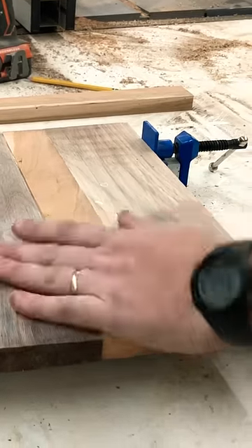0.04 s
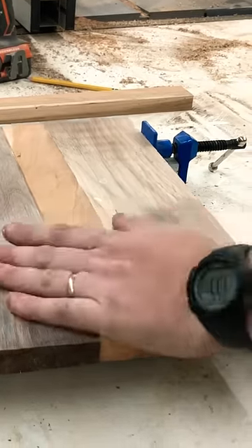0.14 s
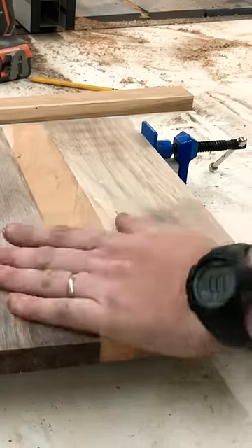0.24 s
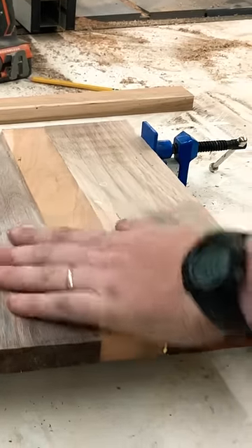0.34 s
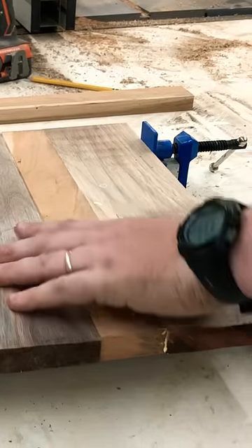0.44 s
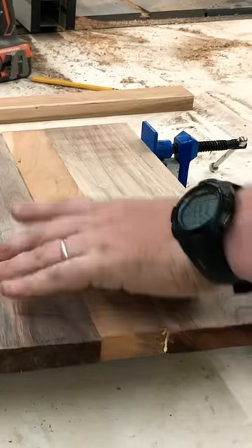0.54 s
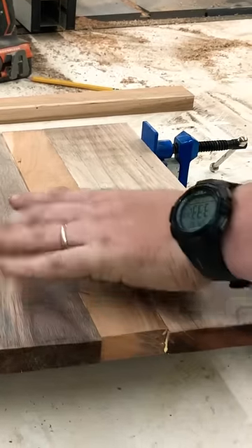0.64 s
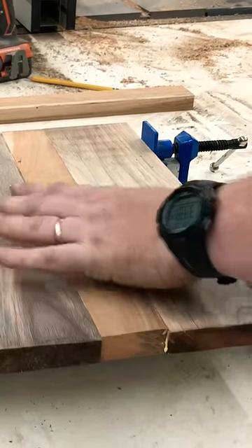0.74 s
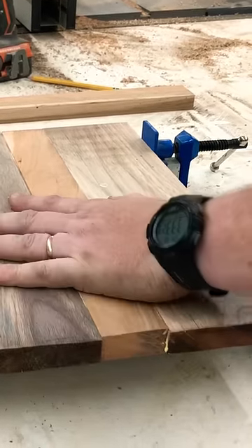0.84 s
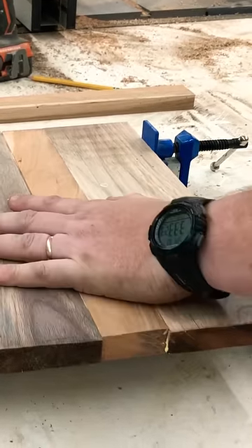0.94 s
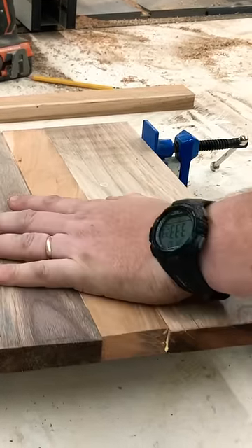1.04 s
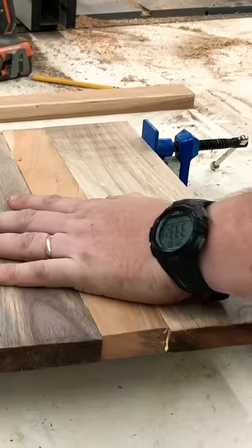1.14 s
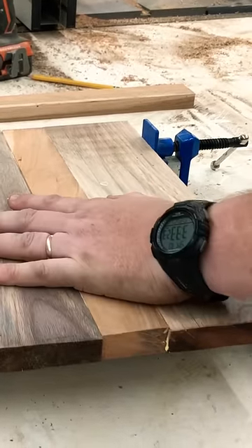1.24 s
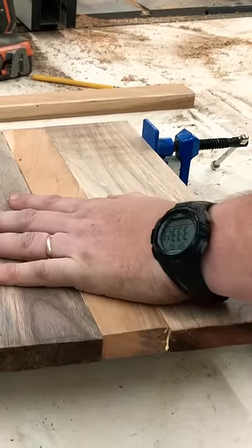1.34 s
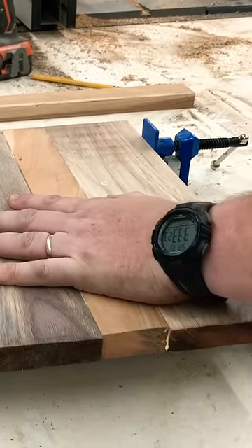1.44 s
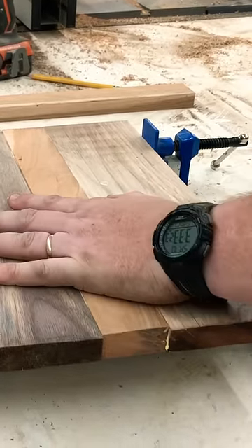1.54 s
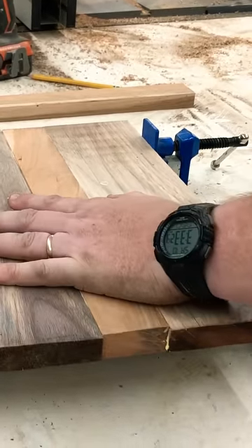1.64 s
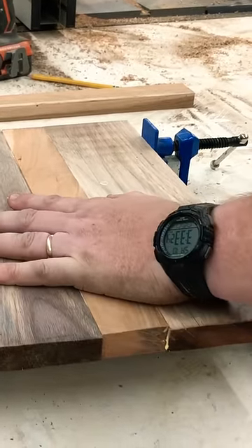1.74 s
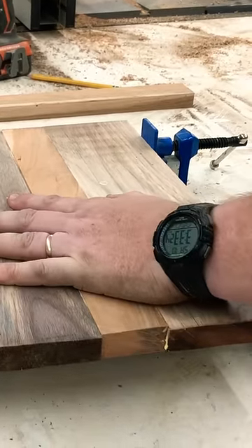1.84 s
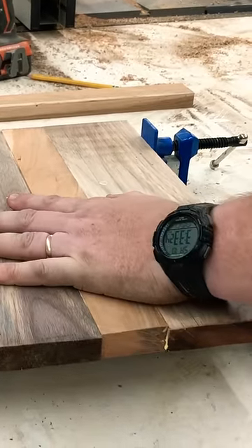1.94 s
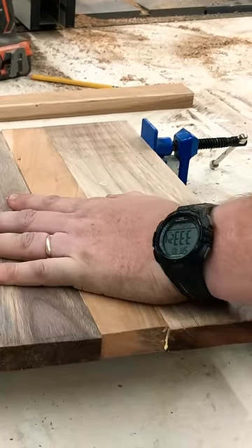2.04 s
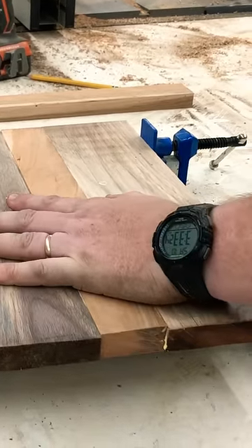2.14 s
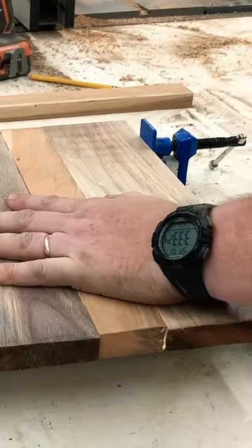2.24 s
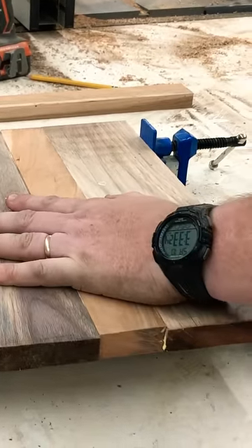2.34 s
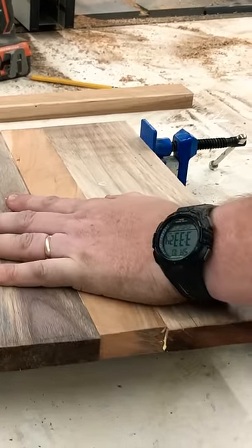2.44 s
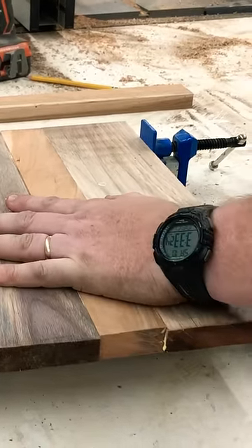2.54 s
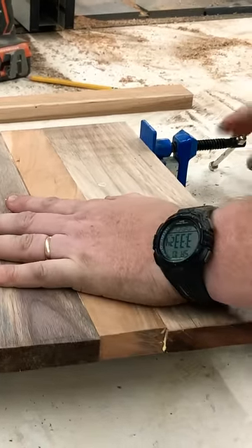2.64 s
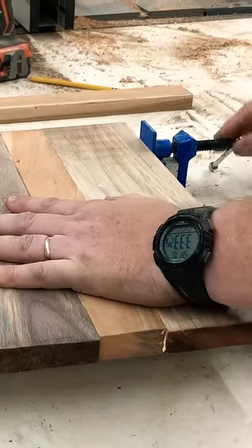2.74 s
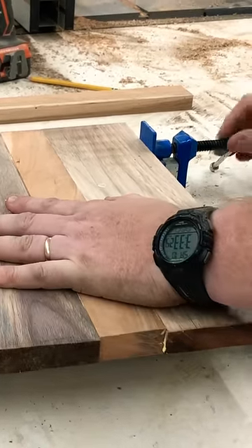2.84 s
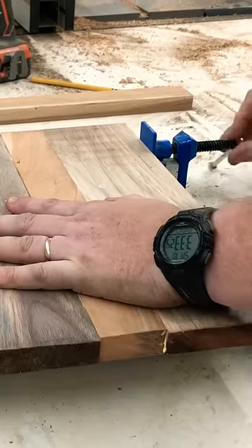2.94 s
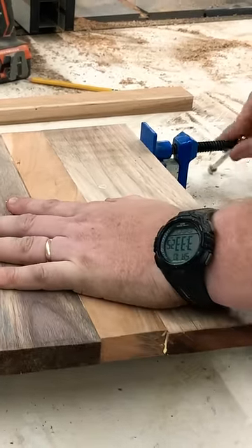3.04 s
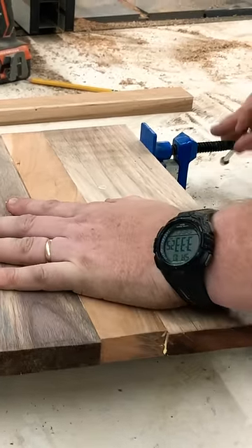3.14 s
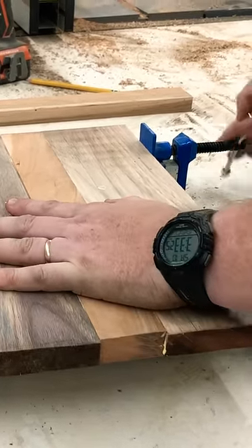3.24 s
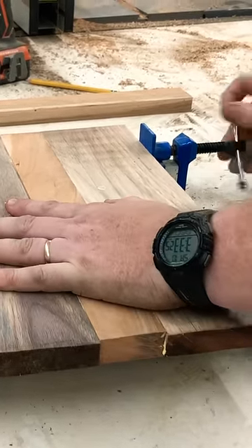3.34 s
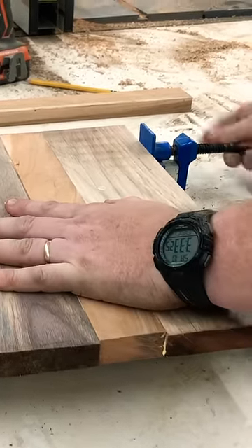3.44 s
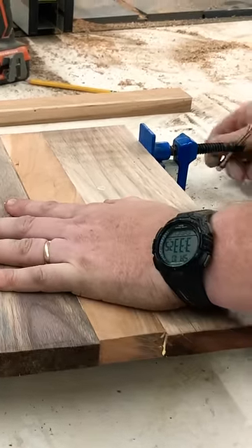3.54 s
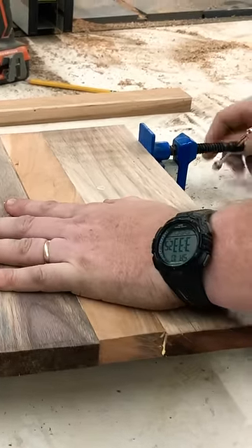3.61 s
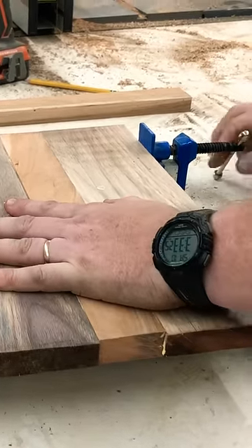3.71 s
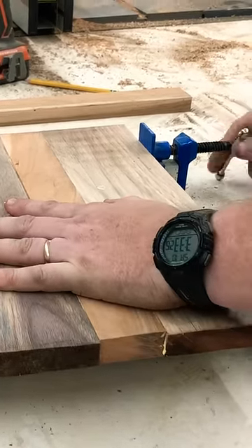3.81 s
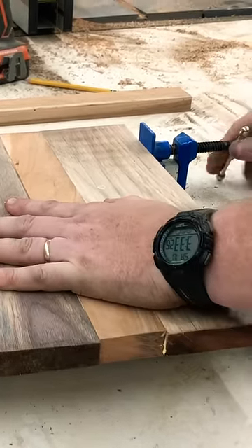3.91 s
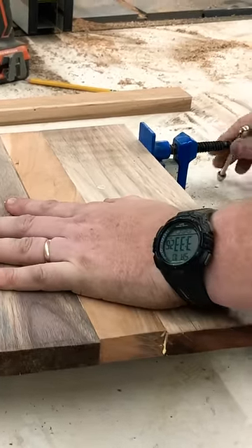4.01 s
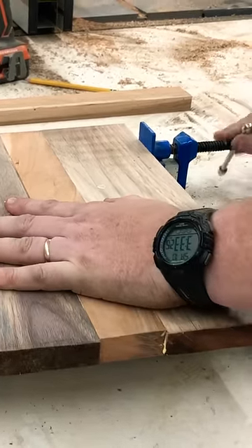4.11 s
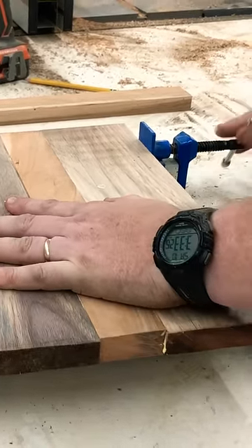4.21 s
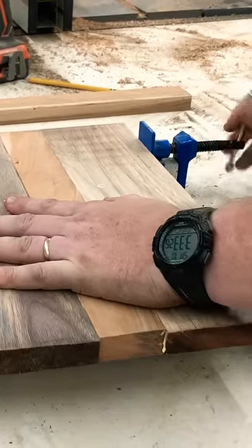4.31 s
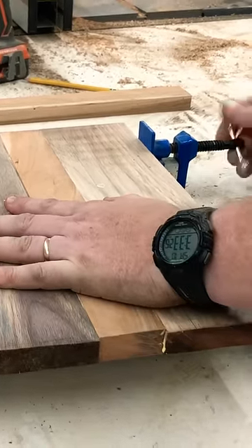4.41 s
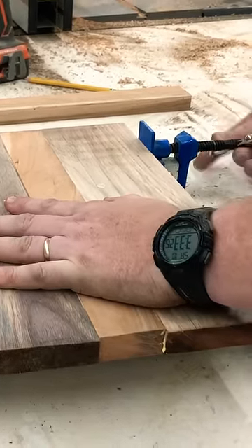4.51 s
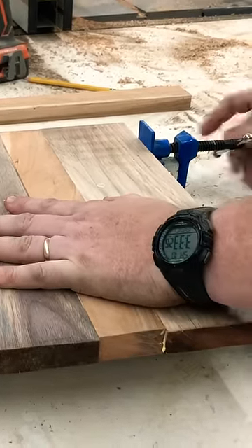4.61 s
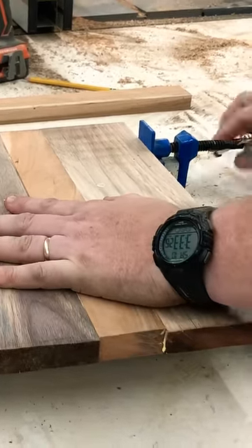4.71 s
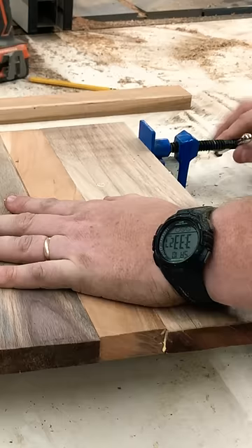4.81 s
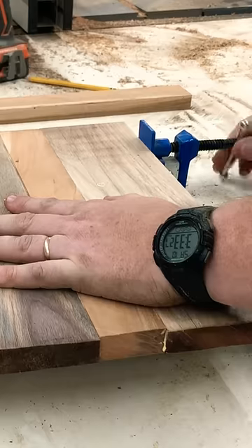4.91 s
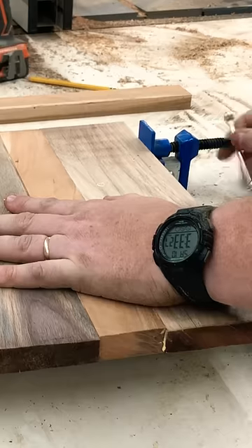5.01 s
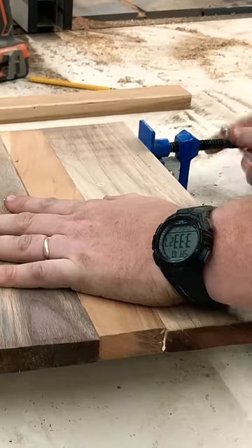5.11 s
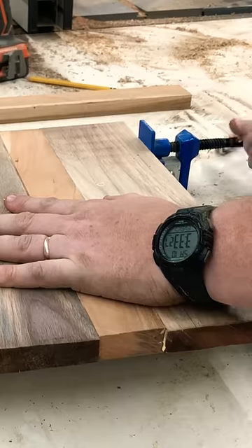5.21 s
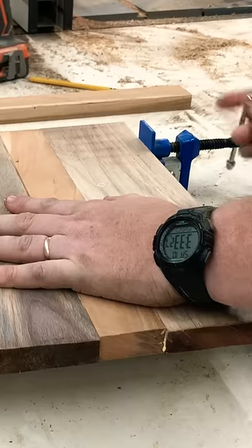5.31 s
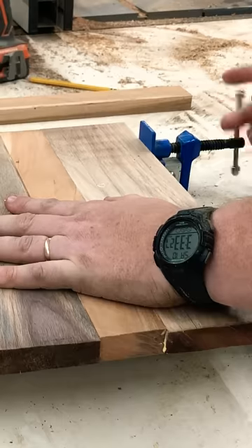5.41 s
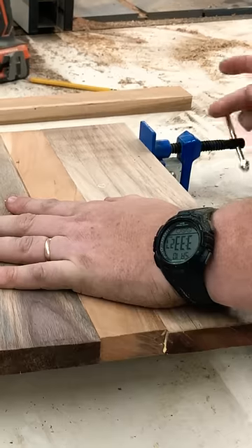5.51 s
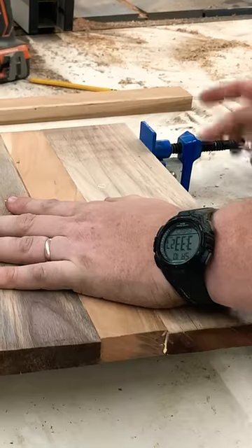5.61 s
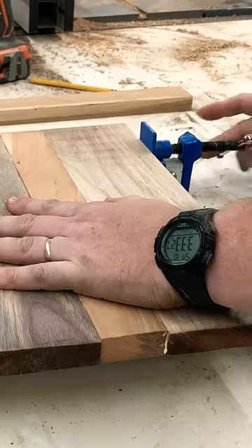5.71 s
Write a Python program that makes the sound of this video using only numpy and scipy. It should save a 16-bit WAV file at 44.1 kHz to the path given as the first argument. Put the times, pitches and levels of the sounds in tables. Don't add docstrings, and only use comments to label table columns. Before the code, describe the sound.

In a small, lightly reverberant workshop, a hand shifts over wooden boards with faint scuffs and one loud knock. A hollow clack follows after a pause, then near-silence. A clamp handle starts clattering, its screw giving soft taps and dry rubbing, and ends with a hard metallic clack and smaller knocks. Close single mono microphone, faint room hum and hiss.

```python
import sys
import numpy as np
from scipy import signal
from scipy.fft import rfft, irfft, next_fast_len
from scipy.io import wavfile
from scipy.ndimage import map_coordinates

SR = 44100
rng = np.random.default_rng(int(sys.argv[2]) if len(sys.argv) > 2 else 0)


def invert_db(x):
    u = np.asarray(x, float) / 20
    return 10 ** u


def store_wav(level_fs):
    pcm = np.round(np.clip(np.atleast_2d(level_fs), -1, 1) * 32767)
    wavfile.write(sys.argv[1], SR, pcm.T.astype(np.int16))


N = 254016

# pitch in Hz, width in Hz, level in dB.
FRAME_MODES = [(62.3, 72, -10), (96.3, 6.3, -1), (145.7, 22.3, 3.5), (220, 120, -4)]
BOARD_MODES = [(216.6, 78, -10), (360.3, 112, 0), (445, 50, 2), (532, 159, -2.5), (713, 97, -7.5)]
PIPE_MODES = [(802, 116, -5.5), (1040, 128, -4.5), (1317, 322, -0.5), (1360, 162, 2), (1706, 210, -8.5),
              (1806, 103, -2.5), (2088, 490, -7.5), (2144, 370, -11.5), (2720, 780, -22)]
STEEL_MODES = [(2415, 510, 7), (3375, 470, 7), (4100, 1200, 4.5), (5630, 530, -2.5), (6070, 197, 1.5),
               (8000, 16000, -12.5)]

# start in seconds, peak in dB, steel edge in dB, strongest pitch in Hz.
PIPE_KNOCKS = [(0.283, -48, 4, 880), (0.537, -56, -28, 1530), (2.752, -37.5, -8.5, 1250),
               (2.846, -42, -20, 860), (2.909, -36.5, -2, 1840), (2.92, -43, 0.5, 1810),
               (2.9485, -30.5, -10, 1240), (3.531, -45, -14, 1360), (3.729, -47.5, -39, 1070),
               (3.89, -53, -33, 1270), (4.059, -42, -40, 875), (4.138, -45.5, -25, 713),
               (4.193, -40, -29, 900), (4.8885, -26, -13.5, 1165), (4.95, -36, -38, 1000),
               (5.424, -35.5, -11, 1185)]
# start in seconds, peak in dB, steel edge in dB,
# strongest pitch in Hz.
BOARD_KNOCKS = [(1.842, -31.5, -5.5, 1360), (2.401, -48, -39, 600), (3.031, -44.5, -9, 875),
                (3.087, -51, -9, 810), (3.219, -50, -4, 1500), (3.625, -49.5, -22, 1380),
                (3.765, -50, -29, 790), (4.081, -51, -34, 1360), (4.4, -55, -4, 1360),
                (4.464, -51.5, -10, 1090), (4.801, -49.5, -4.5, 1710), (5.079, -33.5, -7, 1110),
                (5.16, -41.5, -13, 820)]
# start in seconds, peak in dB, steel edge in dB, strongest pitch in Hz.
PALM_THUMPS = [
    (0.236, -63, 3, 1490),
    (3.417, -60, -26, 768),
]
# start in seconds, peak in dB, strongest pitch in Hz, contact in ms.
PIPE_DRAGS = [(0.2685, -30, 1050, 5.4), (1.732, -46.5, 1590, 11), (1.793, -47, 1460, 62),
              (1.815, -45, 1670, 24), (2.833, -40.5, 1080, 12.6), (3.82, -54.5, 1050, 24),
              (4.14, -44, 725, 18), (4.288, -55, 1020, 8), (4.906, -42, 774, 16), (4.923, -28.5, 1040, 23),
              (4.959, -36, 885, 18), (5.093, -44, 1390, 20)]
# start in seconds, peak in dB, strongest pitch in Hz,
# contact in ms.
BOARD_DRAGS = [(0.259, -40, 1610, 11.5), (1.743, -56, 1590, 38), (2.371, -57.5, 700, 21),
               (2.962, -52, 860, 9.1), (3.129, -52.5, 1150, 7.8), (3.334, -52.5, 800, 51),
               (3.53, -44, 1270, 16), (3.542, -52, 1380, 10), (3.602, -47, 1190, 28),
               (3.664, -57, 1040, 19), (4.065, -47.5, 1300, 21), (4.164, -46, 1200, 17),
               (4.205, -44, 735, 9.3), (4.355, -61.5, 1730, 13), (4.543, -49, 865, 10.6)]
# start in seconds, peak in dB, strongest pitch in Hz, contact in ms.
SCUFFS = [
    (0.011, -60.5, 1710, 47),
    (2.965, -46.5, 2100, 25),
    (4.184, -50.5, 900, 12),
    (4.971, -59, 2600, 17),
]
# start in seconds, peak in dB, push in ms.
FRAME_THUDS = [(0.014, -55, 7.3), (0.267, -41, 4.4), (0.297, -62, 10), (0.342, -49.5, 8.7),
               (0.423, -46.5, 5.2), (0.539, -79, 6.1), (0.8, -49, 23), (1.741, -47.5, 16),
               (1.841, -46, 5.8), (2.763, -51.5, 8.9), (2.946, -62, 7.7), (3.248, -49, 9.2),
               (3.269, -49.5, 16), (3.341, -53, 10), (3.415, -41, 2.9), (3.539, -49, 11.5),
               (3.624, -43.5, 27), (4.065, -49.5, 4.5), (4.19, -48, 7.8), (4.323, -48, 14),
               (4.464, -44.5, 5.5), (4.798, -46.5, 47), (4.884, -40, 12), (5.078, -41.5, 17),
               (5.158, -43, 5.3)]

# start in seconds, peak in dB,
# pitch in Hz, ring in ms.
BUMPS = [(.238, -46, 350, 8.7), (0.2697, -27.5, 1096, 3.8), (0.2694, -31.5, 1515, 5), (.270, -31, 596, 5.6),
         (.270, -44.5, 2600, 4.4), (0.2706, -27, 220, 9), (.295, -42, 198, 13), (.35, -43, 248, 14),
         (.425, -46, 203, 25), (.536, -54, 1505, 7.2), (1.819, -50, 1730, 6), (2.753, -42, 1490, 3.6),
         (2.755, -49.5, 685, 8.8), (2.862, -47, 450, 6.7), (2.919, -45, 5540, 4), (2.96, -35, 1086, 5.5),
         (3.087, -47, 458, 5.4), (3.512, -54, 905, 8.3), (3.531, -42.5, 990, 4), (3.546, -46, 400, 5.4),
         (3.612, -46, 1210, 4), (3.627, -48, 347, 8), (3.69, -50, 550, 7.1), (3.768, -58, 353, 9.9),
         (4.038, -60.5, 684, 11), (4.061, -45, 900, 6.4), (4.078, -44, 417, 7.8), (4.14, -51, 1790, 6),
         (4.14, -45, 696, 4.7), (4.171, -42, 1140, 5), (4.189, -45, 931, 4.5), (4.203, -41.5, 1320, 4.2),
         (4.228, -51, 690, 6.3), (4.302, -49.5, 448, 7), (4.354, -58, 1610, 5.1), (4.385, -55.5, 1650, 6),
         (4.548, -53, 856, 7), (4.889, -29, 1095, 6), (4.889, -30.5, 1765, 4.6), (4.89, -34, 570, 7.3),
         (4.905, -38, 600, 7), (4.946, -35, 995, 6), (4.965, -40, 500, 6), (5.081, -36, 1070, 5),
         (5.081, -34, 1680, 5.9), (5.083, -38, 520, 7), (5.159, -35, 547, 6.6), (5.424, -42, 594, 7),
         (5.425, -46, 955, 5.4),
         (1.79, -67, 7640, 18), (1.81, -71, 6700, 30), (1.842, -48, 3000, 2.8), (2.752, -51, 2600, 3.6),
          (2.846, -54, 2300, 4), (2.908, -42, 1950, 4.5), (2.908, -44, 1100, 4), (2.908, -47, 2680, 4.4),
          (2.948, -35, 1400, 4.4), (2.948, -38, 2100, 4.8), (2.948, -46, 2740, 4.8),
          (5.422, -43.5, 2310, 5), (5.424, -51, 4470, 4), (5.44, -62, 2400, 20), (4.8, -52, 1000, 6)]
# start in seconds, peak in dB, contact in ms.
CRACKS = [(2.751, -46, 2.7), (2.847, -55, 4), (2.948, -40, 2), (3.219, -52, 2.5), (4.14, -60, 3),
          (4.199, -51, 3), (4.888, -37, 2.5), (5.079, -44, 3), (5.084, -46, 3), (5.159, -52, 3),
          (5.423, -41.5, 2.5)]
# pitch in Hz, width in Hz, level in dB.
CRACK_MODES = [(2600, 1900, -2.5), (5260, 1700, 3)]

# start in seconds, pitch in Hz, level in dB,
# time to fade by 60 dB in seconds.
RINGS = [(.02, 6600, -70, .25), (.03, 6100, -73, .3), (2.755, 1400, -53, .25), (3.63, 3250, -62, .06),
         (.285, 6600, -70, .12), (.595, 4680, -73, .25), (1.736, 1770, -50, .14), (1.79, 5650, -76, .3),
         (1.843, 1370, -39, .24), (1.86, 620, -50, .25), (2.19, 1360, -67, .6), (2.915, 9780, -66, .12),
         (2.92, 1830, -52, .12), (2.95, 9780, -66, .22), (2.95, 1830, -52, .6), (3.0, 3300, -68, .5),
         (.27, 245, -36, .14), (3.02, 6330, -71, .15), (3.818, 1080, -57, .2), (4.06, 1360, -50, .35),
         (4.065, 3200, -64, .08), (4.215, 705, -52, .25), (4.35, 1620, -63, .1), (4.4, 1400, -60, .3),
         (4.925, 1040, -40, .2), (5.082, 5350, -63, .25), (5.425, 1830, -49, .1)]
# start in seconds, level in dB.
FREE_PIPE_TAP = (.541, -48)
# pitch in Hz, level in dB, time to fade by 60 dB in seconds.
FREE_PIPE_PARTIALS = [(704, -1, .42), (937, -2, .2), (1085, -20, .3), (1385, -14, .2), (1760, -14, .25),
                      (2060, -16, .25), (2430, -23, .2), (2540, -25, 1.6), (2800, -15, .22),
                      (3190, -27, .2)]

# time of full effort in seconds, length in seconds,
# grind in dB, weight on the bench in dB.
STROKES = [(0.031, 0.092, -57, 4), (0.31, 0.085, -54.5, 10.5), (0.432, 0.092, -72.5, 19),
           (0.579, 0.081, -63, -2), (0.858, 0.98, -84.5, 12), (1.798, 0.07, -61, 1),
           (1.93, 0.088, -64, 9.5), (2.163, 0.18, -74.5, -13), (2.45, 0.063, -92, 22), (3, 0.19, -54, -1.5),
           (3.36, 0.32, -70.5, 13), (3.614, 0.056, -57.5, 1), (3.854, 0.2, -83, -7), (4.188, 0.12, -59, 0),
           (4.44, 0.11, -74.5, 19.5), (4.632, 0.069, -97, 34), (4.834, 0.02, -90, 21),
           (4.992, 0.13, -53.5, 0.5), (5.152, 0.097, -61, 2), (5.47, 0.14, -66.5, 5)]
# time of top speed in seconds, length in seconds, hiss in dB, brightest pitch in Hz.
SKIN_SLIDES = [(0.056, 0.12, -63, 5430), (0.105, 0.019, -64.5, 10400), (0.41, 0.2, -69, 7940),
               (0.527, 0.064, -78, 14500), (0.634, 0.036, -69, 10030), (0.956, .05, -75, 12000),
               (2.18, 0.037, -76, 12000), (3.59, 0.043, -67, 11900), (3.673, 0.033, -86, 10000),
               (4.5, .025, -74, 11800), (4.582, 0.031, -69.5, 12000), (4.945, 0.041, -71, 11000),
               (5.227, 0.04, -74, 10000)]
# start in seconds, peak in dB, pitch in Hz, length in cycles.
TICKS = [(0.02, -55, 8700, 9.5), (.019, -58, 6070, 2.7), (0.181, -47, 7600, 3.3), (.182, -67, 13000, 2.4),
         (0.234, -59, 13500, 3), (0.2877, -49.5, 8950, 10), (1.794, -66, 7700, 5.8),
         (1.8407, -54, 12300, 1.3), (1.8443, -41, 3600, 0.97), (1.848, -49, 13000, 2.2),
         (1.987, -53, 13500, 2.9), (1.9862, -60, 8000, 1.8), (2.127, -56, 14000, 4.6),
         (2.127, -59, 8450, 3.7), (2.1795, -64, 13500, 1.9), (2.530, -53, 6600, 3.4),
         (2.908, -38, 6940, 2.3), (2.95, -48, 9000, 2.9), (2.915, -54, 13500, 2.5), (3.193, -60, 6000, 2.5),
         (3.664, -55, 8900, 1.5), (3.628, -52, 3200, 3), (3.604, -60, 2500, 1.2), (.02, -56, 2400, 1),
         (4.197, -50, 5400, 6), (4.889, -54, 11000, 1.3)]

# pitch in Hz, level in dB per Hz.
AIR_COLOUR = [(15, -51), (25, -29), (42, 3), (80, 0.5), (120, -3.5), (373, -7.5), (439, -11), (734, -21.5),
              (1040, -18), (1480, -27.5), (4870, -26.5), (14800, -32.5), (16000, -28)]
# pitch in Hz, time to fade by 60 dB in seconds.
SHOP_FADE = [(100, 0.5), (400, 0.59), (1500, 0.24), (5000, 0.3), (12000, 0.33)]


def knocks():
    pipe_wood_db, board_wood_db, palm_wood_db, scuff_wood_db = -10, 3, 18.5, -11
    knock_ms, drag_edge_db, scuff_edge_db = 8.8, -22, -5

    sharp = []
    for rows, wood_db in ((PIPE_KNOCKS, pipe_wood_db), (BOARD_KNOCKS, board_wood_db), (PALM_THUMPS, palm_wood_db)):
        sharp += [(s, db, wood_db, edge_db, hz, knock_ms) for s, db, edge_db, hz in rows]

    dragged = []
    for rows, wood_db, edge_db in ((PIPE_DRAGS, pipe_wood_db, drag_edge_db),
                                   (BOARD_DRAGS, board_wood_db, drag_edge_db),
                                   (SCUFFS, scuff_wood_db, scuff_edge_db)):
        dragged += [(s, db, wood_db, edge_db, hz, ms) for s, db, hz, ms in rows]

    out = contacts(sharp, rise=0.4, wet_db=-3.0)
    out += contacts(dragged, rise=1.35, wet_db=-3.5)
    for s, db, ms in FRAME_THUDS:
        boom = struck(blow(ms, rise=0.75), FRAME_MODES, top_hz=243, wet_db=-4.0)
        add(out, s, invert_db(db) * boom)
    return out


def contacts(rows, rise, wet_db):
    out = np.zeros(N)
    for s, db, wood_db, edge_db, hz, ms in rows:
        force = blow(ms, rise)
        pipe = struck(force, PIPE_MODES + [(hz, 240, 1.5)], top_hz=2100, wet_db=wet_db)
        wood = struck(force, BOARD_MODES, top_hz=780, wet_db=wet_db + 2.0)
        steel = struck(force, STEEL_MODES, top_hz=9750, wet_db=wet_db - 3.5)
        sound = pipe + invert_db(wood_db) * wood + invert_db(edge_db) * steel
        add(out, s - .001, invert_db(db + 1.0) * sound)
    return out


def blow(ms, rise):
    u = np.arange(2 ** 14) / (max(ms, .3) * SR / 1000)
    force = rng.standard_normal(len(u)) * u ** rise * np.exp(-2.5 * u)
    return np.array([force, walls(len(u), delay=0.00033 + ms / 1500)])


def struck(force, modes, top_hz, wet_db):
    ring = body(modes, rng.normal(0, 1.6, len(modes)))
    direct, echo = filtered(force, lambda f: ring(f) * dulled(f, top_hz))
    echo *= invert_db(wet_db) * np.linalg.norm(direct) / np.linalg.norm(echo)
    return (direct + echo) / np.abs(direct).max()


def bumps():
    notes, cracks = np.zeros(N), np.zeros(N)
    t = np.arange(SR // 10) / SR
    for s, db, hz, ms in BUMPS:
        u = t * 3000 / max(ms, 1)
        envelope = np.e * u * np.exp(-u)
        tone = np.sin(2 * np.pi * (hz * t + rng.random()))
        add(notes, s, invert_db(db) * envelope * tone)
    for s, db, ms in CRACKS:
        decay = np.exp(-t * 1000 / max(ms, .5))
        add(cracks, s, invert_db(db) * rng.standard_normal(len(t)) * decay)
    crack_ring = body(CRACK_MODES)
    cracks = filtered(cracks, lambda f: crack_ring(f) * dulled(f, 6500))
    return shop(notes + cracks, wet_db=-11, delay=.004)


def rings():
    attack_s, tap_swell_s = .003, .012
    tap_s, tap_db = FREE_PIPE_TAP
    rows = [(s, hz, db, t60, attack_s) for s, hz, db, t60 in RINGS]
    rows += [(tap_s, hz, tap_db + db, t60, tap_swell_s) for hz, db, t60 in FREE_PIPE_PARTIALS]

    out, t = np.zeros(N), np.arange(SR // 2) / SR
    for s, hz, db, t60, attack in rows:
        tone = np.sin(2 * np.pi * (hz * t + rng.random()))
        fade = invert_db(db - 60 * t / t60) * (1 - t / t[-1])
        add(out, s, fade * (1 - np.exp(-t / attack)) * tone)
    return out * invert_db(.6 * wobble(40))


def rubbing():
    rest_db = -78.5
    s, length, grind_db, weight_db = np.transpose(STROKES)
    effort = swell(s, length, rise_db=20.5, fall_db=15.5)
    boom_db = grind_db + weight_db
    scrape_db = grind_db + 0.5 * weight_db - 2
    rasp_db = -81.5 + 0.59 * (grind_db - rest_db)
    # stroke levels in dB, extra level at rest in dB, body, softness limit in Hz.
    layers = [(boom_db, -5.5, FRAME_MODES, 250), (scrape_db, -1.0, BOARD_MODES, 800),
              (grind_db, -2.0, PIPE_MODES, 2100), (rasp_db, -8.5, STEEL_MODES, 8000)]

    slips = 1.6 * wobble(35) + 1.6 * wobble(120)
    out = np.zeros(N)
    for db, extra_rest_db, modes, top_hz in layers:
        rough = rng.standard_normal(N) * invert_db(slips + 1.6 * wobble(60))
        ring = body(modes)
        gain = invert_db(db) @ effort + invert_db(rest_db + extra_rest_db)
        out += gain * unit(filtered(rough, lambda f: ring(f) * dulled(f, top_hz)))
    return shop(out, wet_db=-13.5, delay=0.0079) * invert_db(0.5)


def swell(s, length, rise_db, fall_db):
    u = (np.arange(N) / SR - np.reshape(s, (-1, 1))) / np.reshape(length, (-1, 1))
    slope_db = np.where(u < 0, rise_db, -fall_db)
    return invert_db(np.maximum(slope_db * u, -200))


def skin():
    s, length, db, bright_hz = np.transpose(SKIN_SLIDES)
    gains = swell(s, length, rise_db=11.5, fall_db=10)
    hiss = []
    for hz in bright_hz:
        colour = body([(hz, .3 * hz, 0), (15600, 1500, -5)])
        half_second = unit(filtered(rng.standard_normal(SR // 2), colour))
        hiss.append(np.resize(half_second, N))
    return invert_db(db) @ (gains * hiss) * invert_db(2.9 * wobble(50) - 3.0)


def ticks():
    out, t = np.zeros(N), np.arange(SR // 8) / SR
    for s, db, hz, cycles in TICKS:
        snap = rng.standard_normal(len(t)) * np.exp(-t / .0005)
        band = body([(hz, hz / max(cycles, .5), 0)])
        dry_snap = peak_one(filtered(snap, lambda f: band(f) ** 2))
        add(out, s, invert_db(db) * shop(dry_snap, wet_db=-15, delay=.004))
    return out


def air():
    hiss = filtered(rng.standard_normal(N), lambda hz: invert_db(along(AIR_COLOUR, hz)))
    return invert_db(-67.5 + 0.36 * wobble(2.0)) * unit(hiss)


def shop(x, wet_db, delay):
    return x + invert_db(wet_db) * signal.fftconvolve(x, walls(SR // 2, delay))[:len(x)]


def walls(length, delay):
    hz, t, z = signal.stft(rng.standard_normal(length), SR, nperseg=256)
    fade = invert_db(-60 * t / along(SHOP_FADE, hz)[:, None])
    tail = signal.istft(z * fade, SR, nperseg=256)[1]
    tail *= 1 - np.exp(-np.arange(len(tail)) / (delay * SR))
    return tail[:length] / np.linalg.norm(tail)


def body(modes, extra_db=0):
    hz, width, db = np.transpose(modes)[:, :, None]
    sign = (-1.) ** np.arange(len(modes))[:, None]
    gain = invert_db(db + np.reshape(extra_db, (-1, 1))) * sign
    return lambda f: np.sum(gain * 1j * f * width / (hz * hz - f * f + 1j * f * width), axis=0)


def dulled(f, top_hz):
    x = 1j * f / top_hz
    return 1 / ((1 + x) * (1 + x + x * x))


def filtered(x, response):
    n = x.shape[-1]
    m = next_fast_len(n + 4096)
    return irfft(rfft(x, m) * response(np.fft.rfftfreq(m, 1 / SR)), m)[..., :n]


def along(points, hz):
    f, v = np.transpose(points)
    return np.interp(np.log(hz + 1), np.log(f + 1), v)


def wobble(rate):
    points = rng.standard_normal(int(N * rate / SR) + 4)
    return map_coordinates(points, [np.arange(N) * rate / SR])


def unit(x):
    return x / np.sqrt(np.mean(x ** 2) + 1e-20)


def peak_one(x):
    return x / (np.abs(x).max() + 1e-20)


def add(track, s, sound):
    part = track[round(s * SR):][:len(sound)]
    part += sound[:len(part)]


def scene():
    return (knocks() + bumps() + rings() + rubbing() + skin() + ticks() + air())[None]


def top_cut(x):
    return signal.sosfilt(signal.butter(12, 16460, fs=SR, output="sos"), x)


def record(dry):
    heard = filtered(dry[0], lambda hz: (hz < 15800) * (1j * hz / (55 + 1j * hz)) ** 2)
    return top_cut(heard[None])


dry = scene()
out = record(dry)
store_wav(out)
```